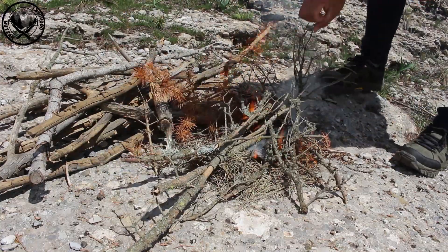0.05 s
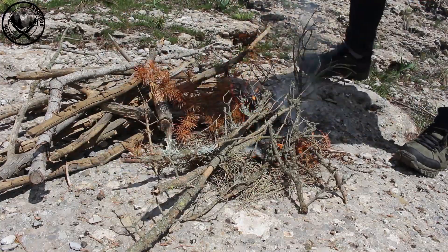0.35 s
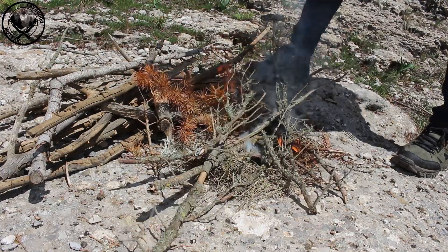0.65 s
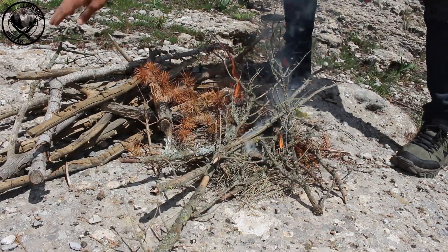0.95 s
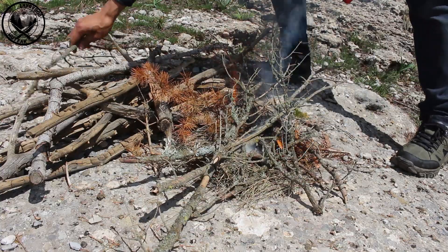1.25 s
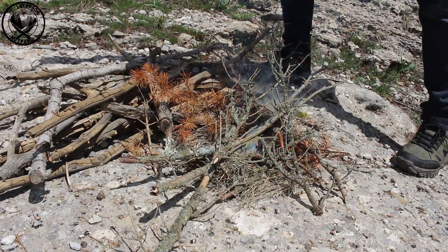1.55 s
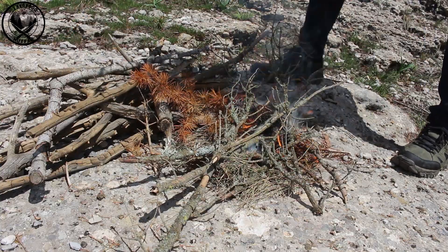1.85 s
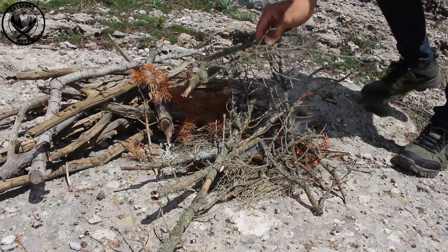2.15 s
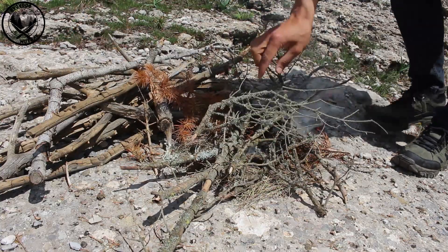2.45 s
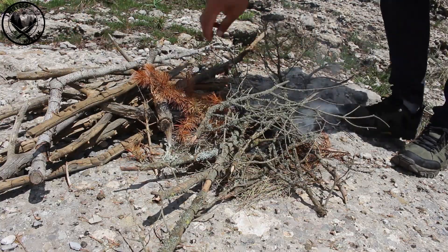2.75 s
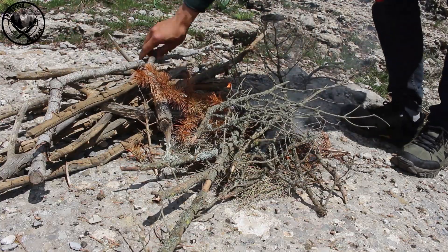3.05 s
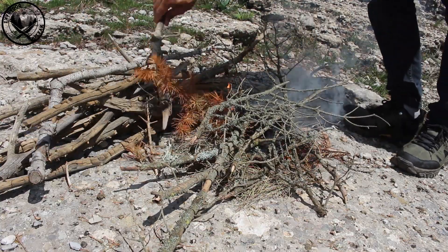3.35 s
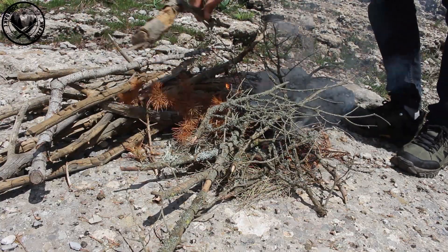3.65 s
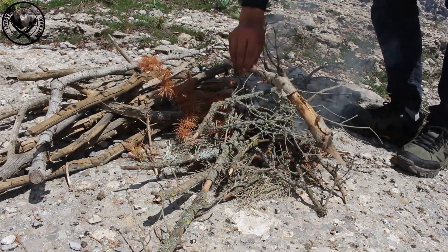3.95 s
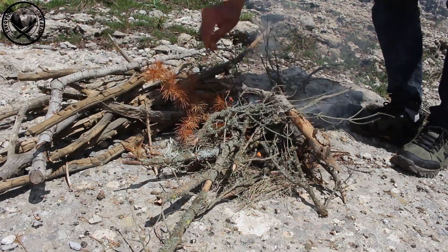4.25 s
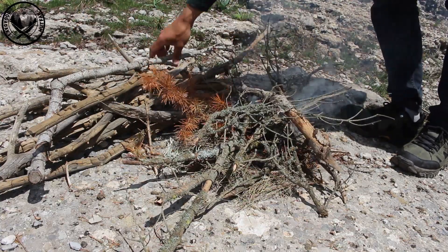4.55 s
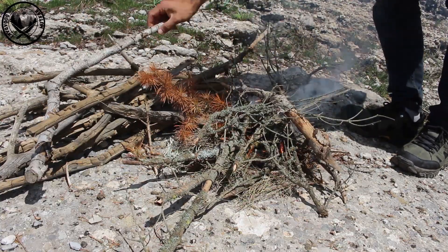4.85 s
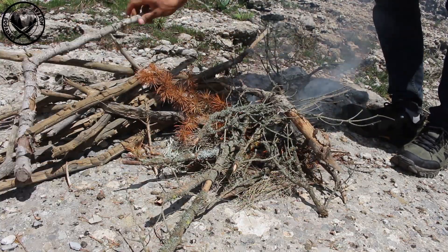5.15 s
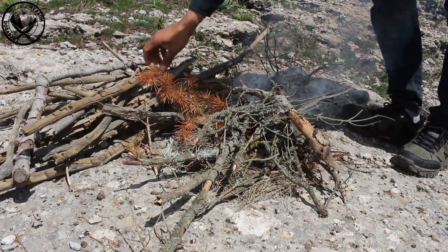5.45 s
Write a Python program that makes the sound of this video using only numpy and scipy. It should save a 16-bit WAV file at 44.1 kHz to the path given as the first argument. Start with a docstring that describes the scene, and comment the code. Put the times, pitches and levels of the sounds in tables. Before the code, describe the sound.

A small campfire burns close by on an open hillside, starting with a sharp pop. Needles tick and sizzle over fluttering flames, with loud snaps scattered through the first 1.5 seconds and a tight cluster around 1.8. Meanwhile, until about 3 seconds, shoes grind on gritty rock with a few soft thuds, and handled twigs rustle. Dry sticks clatter with a brief woody ring at 3.2 seconds, followed by a duller knock at 3.5 and more rustling. Strong pops come at 3.3, 3.6 and 3.9 seconds, then the fire grows quieter. After a soft bump at 4.5, a branch rasps jerkily over the woodpile, knocking at 5.2 and scraping loudest, with another knock, around 5.4. Light wind rumbles at the microphone throughout, with a low gust near 5 seconds. A faint, distant bird whistles three times in the first second and calls again around 4 to 4.6 seconds.

```python
"""A sharp pop opens on a small campfire of dry needles and twigs, close by on an open, rocky hillside.
Steam pockets burst, needles tick and sizzle, flames flutter and slowly die down. Someone grinds his
soles on the gritty rock, rummages in the woodpile to the left and lays sticks on the fire, which ring
as they strike. Light air rumbles at the microphone and a bird whistles far away."""
import sys
import numpy as np
from scipy import signal
from scipy.fft import rfft, irfft, next_fast_len
from scipy.io import wavfile
from scipy.ndimage import uniform_filter1d, map_coordinates

SR = 44100
rng = np.random.default_rng(int(sys.argv[2]) if len(sys.argv) > 2 else 0)


def store_wav(level_fs):
    """Save 16-bit WAV to argv[1]."""
    pcm = np.round(np.clip(np.atleast_2d(level_fs), -1, 1) * 32767)
    wavfile.write(sys.argv[1], SR, pcm.T.astype(np.int16))


N = 246519
TIME = np.arange(N) / SR
SHORT = np.arange(SR // 5) / SR  # time within one pop, knock or call [s]


def amp(db):
    """Decibels to gain."""
    return 10 ** (np.asarray(db) / 20)


def unit(x):
    """Scale to rms 1."""
    return x / np.sqrt(np.mean(x ** 2) + 1e-20)


def burst(x):
    """Scale a short sound to the energy of 10 ms at rms 1."""
    return x / np.sqrt(np.mean(np.sum(x ** 2, axis=-1)) / (SR / 100) + 1e-20)


def along(points, hz):
    """Read (frequency, value) points on a log axis."""
    freqs, values = np.transpose(points)
    return np.interp(np.log(hz + 1), np.log(freqs), values)


def wobble(rate):
    """A smooth random curve, rate knots a second."""
    return map_coordinates(rng.standard_normal(int(N * rate / SR) + 4), [TIME * rate])


def filtered(x, response):
    """Apply a response given as a function of frequency."""
    size = next_fast_len(N + SR // 4)
    return irfft(rfft(x, size) * response(np.fft.rfftfreq(size, 1 / SR)), size)[..., :N]


def coloured(x, spectrum, size=2048):
    """Minimum-phase colouring, so that attacks stay sharp."""
    gain = amp(along(spectrum, np.fft.rfftfreq(size, 1 / SR)))
    cepstrum = irfft(np.log(gain))
    cepstrum[1:size // 2] *= 2
    cepstrum[size // 2 + 1:] = 0
    impulse = irfft(np.exp(rfft(cepstrum)))
    return signal.fftconvolve(x, impulse[None], axes=1)[:, :N]


def add(track, s, sound):
    """Mix a sound into the track at time s."""
    start = int(np.clip(round(s * SR), 0, N - 1))
    track[:, start:start + sound.shape[-1]] += sound[..., :N - start]


def dying(t60, width):
    """Stereo noise that swells for an instant and dies away."""
    common, left, right = rng.standard_normal((3, len(SHORT)))
    envelope = amp(-60 * SHORT / t60) * (1 - np.exp(-SHORT / 0.00019))
    return (common + width * np.array([left, right])) * envelope


def smeared(pulse, tail):
    """Draw a pulse out over a stereo tail of noise."""
    return signal.fftconvolve(tail, pulse[None], axes=1)[:, :len(SHORT)]


# Diffuse sound at the microphone pair: (frequency [Hz], left-right correlation [-1..1])
LIKENESS = [(30, -0.58), (70, 0.76), (130, 0.91), (5000, 0.46), (14000, 0.31)]
def spread(pair):
    """Two unrelated signals become left and right with the likeness of the place."""
    def mid_side_gains(hz):
        angle = np.arccos(np.clip(along(LIKENESS, hz), -1, 1)) / 2
        return np.array([np.cos(angle), np.sin(angle)])
    mid, side = filtered(pair, mid_side_gains)
    return np.array([mid + side, mid - side])


# Low rumble at the microphone: (time [s], level [dB])
RUMBLE_LEVELS = [(0.0, -46), (4.9, -54.5), (5.59, -45.5)]
# That rumble, and the hush of the open slope all around: (frequency [Hz], level [dB])
RUMBLE_SPECTRUM = [(20, -37), (50, -7), (105, -1), (200, -2.5), (500, -14.5), (5000, -87)]
HUSH_SPECTRUM = [(200, -3), (700, -7), (2500, -10.5), (9000, -17), (16000, -23.5)]
def air():
    """Light wind and flames rumble over the even hush of the hillside."""
    rumble_db = np.interp(TIME, *np.transpose(RUMBLE_LEVELS))
    rumble = unit(coloured(spread(rng.standard_normal((2, N))), RUMBLE_SPECTRUM))
    hush = unit(coloured(spread(rng.standard_normal((2, N))), HUSH_SPECTRUM))
    return amp(rumble_db + 0.29 * wobble(9.9)) * rumble + amp(-58.5) * hush


# Falling whistles and arched chirps, far from the microphone: (time [s], level [dB])
FAR_WHISTLES = [(0.025, -52), (0.47, -54), (0.945, -54), (4.41, -57.5)]
FAR_CHIRPS = [(3.795, -62.5), (4.605, -64)]
def bird(pitch_blur=0.018):
    """Thin calls, blurred by distance: each glides along a parabola through its turning point."""
    out = np.zeros((2, N))
    def sing(calls, length_s, from_hz, turn_hz, turn_share):
        progress = np.clip(SHORT / length_s, 0, 1)
        glide = turn_hz + (from_hz - turn_hz) * (1 - progress / turn_share) ** 2
        swell = 2 * np.sqrt(progress * (1 - progress))
        for s, db in calls:
            hz = glide * (1 + pitch_blur * wobble(500)[:len(SHORT)])
            add(out, s, amp(db) * swell * np.sin(2 * np.pi * np.cumsum(hz) / SR))
    sing(FAR_WHISTLES, length_s=0.1, from_hz=2400, turn_hz=2180, turn_share=0.9)
    sing(FAR_CHIRPS, length_s=0.12, from_hz=4050, turn_hz=5100, turn_share=0.68)
    return out


# Gusts right on the microphone: (time [s], level [dB])
GUST_LEVELS = [(0.0, -66), (0.4, -57), (4.87, -77), (5.08, -43), (5.59, -67)]
# Their deep buffeting: (frequency [Hz], level [dB])
GUST_SPECTRUM = [(15, -42), (30, -6), (55, -15), (110, -11), (400, -52)]
def gusts():
    """Gusts push on the two microphone ports, mostly in opposite directions."""
    gust_db = np.interp(TIME, *np.transpose(GUST_LEVELS))
    mid, side = coloured(rng.standard_normal((2, N)), GUST_SPECTRUM) * amp([[-6], [0]])
    return amp(gust_db) * unit(np.array([mid + side, mid - side]))


def grit(spectrum, rate, size_db, smooth, slip_s=0.0019):
    """Tiny slips of random size, about rate a second, over a smoother rubbing noise."""
    onsets = rng.random(N) < rate / SR
    sizes = amp(size_db * np.minimum(rng.standard_exponential(N), 3))
    slips = signal.lfilter([1], [1, -np.exp(-1 / (slip_s * SR))], onsets * sizes)
    friction = (unit(slips) + smooth) * rng.standard_normal((2, N))
    return unit(coloured(spread(friction), spectrum))


# Fireside noise, dull (flames, soles) and bright (needles, twigs): (frequency [Hz], level [dB])
DULL_SPECTRUM = [(40, -50), (110, 3.5), (320, 2), (600, -1), (1000, -8.5), (5000, -22), (16000, -55)]
BRIGHT_SPECTRUM = [(200, -7), (700, -14), (1400, -4.5), (2800, -4), (8500, -13), (12000, -22), (16000, -38)]
def burning(fade_db_per_s=1.55):
    """Flames flutter and needles sizzle, flaring unevenly and slowly dying down."""
    heat_db = 2.6 * wobble(7.09) - fade_db_per_s * TIME
    flutter = amp(-48) * grit(DULL_SPECTRUM, rate=270, size_db=-0.5, smooth=0.12)
    sizzle = amp(-52) * grit(BRIGHT_SPECTRUM, rate=160, size_db=3.5, smooth=0.55)
    return amp(heat_db) * (flutter + sizzle)


def strokes(rows, rise_share=0.43, edge_db=13, roundness=1.36):
    """Force of a series of movements: each swells to its peak and eases off more slowly."""
    power = np.zeros(N)
    for peak_s, length_s, db in rows:
        away = np.maximum((peak_s - TIME) / rise_share, (TIME - peak_s) / (1 - rise_share)) / length_s
        power += amp(db - edge_db * np.minimum(away, 10) ** roundness) ** 2
    return np.sqrt(power)


def twig_resonances(x, patchy_db, size=256):
    """Ever different twigs touch, so brief, broad resonances come and go in the rustle."""
    spectra = signal.stft(x, nperseg=size)[2]
    patches = uniform_filter1d(rng.standard_normal(spectra.shape[1:]), size=5, axis=0)
    patches = uniform_filter1d(patches, size=7, axis=1)
    spectra = spectra * amp(patchy_db * unit(patches))
    return unit(signal.istft(spectra, nperseg=size)[1][:, :N])


# Soles on the rock and hands in the twigs, beside the fire: (peak time [s], length [s], level [dB])
SOLE_STROKES = [(0.152, 0.1, -40), (0.385, 0.066, -41.5), (0.54, 0.061, -36.5), (0.885, 0.2, -41),
                (1.08, 0.64, -45), (1.9, 0.14, -41.5), (2.05, 0.18, -39.5), (2.362, 0.039, -42),
                (2.665, 0.32, -40.5)]
HAND_STROKES = [(0.718, 0.093, -36), (1.235, 0.061, -43), (1.44, 0.052, -41.5), (2.345, 0.046, -41),
                (3.365, 0.13, -42.5), (3.52, 0.16, -46), (3.985, 0.14, -42.5), (4.072, 0.075, -45.5)]
def tending(branch_weight_db=-9.5):
    """Soles grind on the rock; brushed twigs and needles rustle, with a low rub from their branch."""
    feet, hands = strokes(SOLE_STROKES), strokes(HAND_STROKES)
    weight = np.hypot(feet, amp(branch_weight_db) * hands)
    scuff = grit(DULL_SPECTRUM, rate=420, size_db=5.0, smooth=0.38)
    rustle = grit(BRIGHT_SPECTRUM, rate=650, size_db=4.5, smooth=0.38)
    return weight * scuff + hands * twig_resonances(rustle, patchy_db=2.8)


# A branch dragged on the woodpile, just left of the microphone: (peak time [s], length [s], level [dB])
BRANCH_STROKES = [(4.678, 0.06, -46), (4.705, 0.035, -44.5), (4.79, 0.07, -49.5), (4.963, 0.09, -47),
                  (5.13, 0.26, -44.5), (5.39, 0.42, -44), (5.36, 0.066, -30.5), (5.453, 0.059, -34.5)]
# Its rasp: (frequency [Hz], level [dB])
BARK_SPECTRUM = [(300, -5.5), (1050, -1.5), (2100, -1), (5300, -9), (7000, -14), (14000, -26.5)]
def dragged_branch(jerk_db=2, left_db=0.5):
    """Bark rasps over bark in short jerks."""
    force = strokes(BRANCH_STROKES) * amp(jerk_db * wobble(45))
    rasp = grit(BARK_SPECTRUM, rate=550, size_db=7, smooth=0.5)
    return force * twig_resonances(rasp, patchy_db=3.8) * amp([[left_db], [-left_db]])


# Shoes and logs bumping the ground nearby: (time [s], level [dB], frequency [Hz])
GROUND_BUMPS = [(0.36, -33, 200), (0.387, -34.5, 110), (0.407, -33.5, 318), (1.912, -37.5, 280),
                (2.039, -36.5, 590), (2.673, -36, 382), (4.51, -34, 203)]
def thuds():
    """Soft, heavy contacts: a low push with hardly any ring."""
    out = np.zeros((2, N))
    for s, db, hz in GROUND_BUMPS:
        push = np.sin(2 * np.pi * hz * SHORT) * np.exp(-SHORT * hz / 0.086)
        earth = smeared(push, dying(t60=0.035, width=0.15))
        add(out, s, amp(db) * burst(burst(push) + amp(3.5) * burst(earth)))
    return coloured(out, [(25, -5), (120, 1.5)])


# Bending modes of a dry stick, scaled by each knock: (frequency [Hz], level [dB], t60 [s])
STICK_MODES = [(988, -8.5, 0.1), (1556, 4, 0.033), (1752, 0, 0.065), (2520, 0, 0.045), (4310, 2.5, 0.036),
               (5560, 3.5, 0.024), (6600, 4, 0.015)]
# Wood striking wood at the fireside:
# (time [s], level [dB], pitch [ratio], ring time [ratio], hardness as treble tilt [dB/octave])
STICK_KNOCKS = [(3.1447, -36.5, 0.99, 1.1, -2.5), (3.152, -33.5, 0.98, 1.15, -3),
                (3.1606, -36.5, 0.95, 0.67, 0.5), (3.221, -25.5, 0.97, 0.86, 4.5),
                (3.533, -32, 0.54, 0.56, -6), (4.1198, -41, 0.61, 0.65, 6), (4.173, -40.5, 0.95, 0.17, -5),
                (4.5092, -42, 0.546, 0.15, -2), (5.1503, -31.5, 0.83, 0.13, 9.5),
                (5.2231, -38, 0.69, 0.64, 8), (5.437, -28.5, 0.88, 0.62, -4.5)]
def sticks(blur_rad=0.04, spot_db=1.5):
    """Each contact is a short scrape that sets the stick's modes ringing; a held stick rings less."""
    out = np.zeros((2, N))
    for s, db, pitch, ring, tilt_db in STICK_KNOCKS:
        phases = 2 * np.pi * rng.random((len(STICK_MODES), 1))
        # bark and loose contact blur the ring
        drift = blur_rad * np.cumsum(rng.standard_normal((len(STICK_MODES), len(SHORT))), axis=1)
        modes = np.zeros(len(SHORT))
        for (hz, mode_db, t60), phase in zip(STICK_MODES, phases + drift):
            struck_db = mode_db + tilt_db * np.log2(hz) + rng.normal(0, spot_db)  # a new spot each blow
            envelope = amp(struck_db - 60 * SHORT / (t60 * ring))
            modes += envelope * np.sin(2 * np.pi * hz * pitch * SHORT + phase)
        contact = dying(t60=0.061 * ring, width=0.87)
        scrape = signal.lfilter([1, 1], [1, -0.5], contact)  # soft bark dulls it
        add(out, s, amp(db) * burst(burst(modes) + amp(-7) * burst(scrape)))
    return out


def shock(hz):
    """The pressure pulse of a bursting pocket: one push and its rebound, shorter for small pockets."""
    pole = np.exp(-2 * np.pi * min(hz, SR / 4) / SR)
    return burst(signal.lfilter([1, -1], [1, -2 * pole, pole ** 2], SHORT == 0))


def tick(centre_hz=3400):
    """A dry needle splits: a thin click and a brief tearing of fibres, somewhere across the fire."""
    pitch, side = rng.uniform(-1, 1, 2)
    click = shock(centre_hz * 2 ** (0.5 * pitch))
    tear = smeared(click[:SR // 200], dying(t60=0.018, width=0.35))
    return burst(click + amp(-5.5) * burst(tear)) * amp([[2 * side], [-2 * side]])


def pop(hz, scatter_db, twig_hz=6000, detour_s=0.0005):
    """The direct shock, then its scatter among the sticks and stones, and a faint answer from the slope."""
    pulse = shock(hz)
    suction = -0.18 * pulse  # runs ahead of the front
    direct = burst(suction + 0.5 * np.roll(pulse, 2) + np.roll(pulse, 4))
    near = burst(dying(t60=0.015, width=0.33))
    slope = amp(-13.5) * burst(dying(t60=0.07, width=0.75))
    bright = shock(np.sqrt(hz * twig_hz))[:SR // 200]  # thin sticks throw back mainly the short waves
    scatter = smeared(bright, near + slope)
    delayed = np.pad(scatter, ((0, 0), (int(detour_s * SR), 0)))[:, :len(SHORT)]
    return burst(direct + amp(scatter_db) * burst(delayed))


# Steam pockets bursting and twigs snapping, close to the microphone:
# (time [s], level [dB], centre frequency [Hz], scatter against direct sound [dB])
STEAM_POPS = [(0.0272, -20, 2680, 2), (0.097, -36, 2700, -31), (0.1386, -39.5, 2580, -24),
              (0.281, -24, 2550, -3.5), (0.313, -29, 4550, -2.5), (0.3943, -33, 4650, -1.5),
              (0.5116, -35, 2820, 5), (0.6509, -25.5, 2870, -4.5), (0.69, -25, 1550, 4),
              (0.723, -32, 2500, -4), (0.7736, -22, 2150, -0.5), (1.0085, -35.5, 3180, 0),
              (1.3526, -23, 2700, -4.5), (1.734, -18.5, 1830, -0.5), (1.754, -32, 2120, -4),
              (1.766, -24, 1060, 1), (1.7855, -29, 2700, 5), (1.8446, -33, 2070, 3.5),
              (1.865, -34.5, 3400, 4), (2.2037, -24.5, 2560, -5.5), (2.9256, -31.5, 1470, -8),
              (3.2808, -23, 1910, 7), (3.5906, -25.5, 1330, -2.5), (3.9024, -20, 2100, 3.5),
              (4.873, -36, 3970, 1.5), (5.4374, -40, 1500, -14)]
# Dry needles splitting in the heat: (time [s], level [dB])
NEEDLE_TICKS = [(0.556, -38.5), (0.573, -41), (0.5938, -40), (0.8148, -40.5), (0.898, -54), (0.9753, -43.5),
                (1.024, -43), (1.055, -39.5), (1.1029, -45.5), (1.212, -47.5), (1.2592, -39.5),
                (1.3853, -46), (1.391, -45.5), (1.4118, -46), (1.4611, -41.5), (1.495, -47), (1.6066, -40),
                (1.9696, -44), (2.4863, -44.5), (2.613, -43), (2.7204, -41), (2.7524, -46.5),
                (2.8223, -47.5), (2.8446, -42.5), (2.9357, -53), (2.975, -47), (2.984, -49),
                (3.6166, -48.5), (3.742, -48.5), (3.7798, -42), (3.9661, -47.5), (4.0658, -45),
                (4.5855, -43.5), (4.725, -45.5), (4.8401, -49.5), (5.579, -45)]
# Colour of all the crackle at the microphone: (frequency [Hz], gain [dB])
CRACKLE_COLOUR = [(30, 3), (380, 5), (900, 1.5), (2000, 4), (5200, 0.5), (8800, 3), (11300, 0.5),
                  (16500, -12)]
def crackle(faint_ticks=100, fade_db_per_s=1.9):
    """Loud pops, clear ticks, and faint ticks that thin out and fade as fresh wood covers the flames."""
    out = np.zeros((2, N))
    for s, db, hz, scatter_db in STEAM_POPS:
        add(out, s, amp(db) * pop(hz, scatter_db))
    for s, db in NEEDLE_TICKS:
        add(out, s, amp(db) * tick())
    for when, size in rng.random((faint_ticks, 2)):
        s = when ** 1.5 * N / SR  # crowded towards the start
        db = -55 + 10 * size ** 2 - fade_db_per_s * s
        add(out, s, amp(db) * tick())
    return coloured(out, CRACKLE_COLOUR)


def scene(right_lead_s=11e-6):
    """The fire lies slightly right of the microphone: it crackles a little louder and earlier there."""
    fire = crackle() * amp([[-0.8], [0.7]])
    fire = filtered(fire, lambda hz: np.exp(1j * np.pi * hz * right_lead_s * np.array([[-1], [1]])))
    return fire + burning() + sticks() + thuds() + tending() + dragged_branch() + air() + gusts() + bird()


def record(dry, top_hz=16300):
    """The microphone chain clips at full scale and keeps nothing above its band limit."""
    return filtered(np.clip(dry, -1, 1), lambda hz: 1 / (1 + (hz / top_hz) ** 80))


dry = scene()
out = record(dry)
store_wav(out)
```